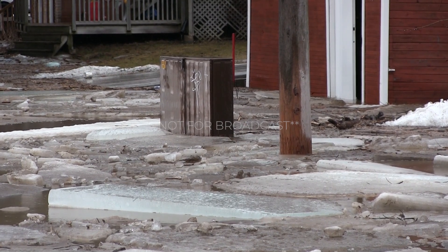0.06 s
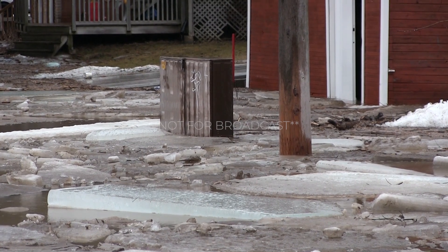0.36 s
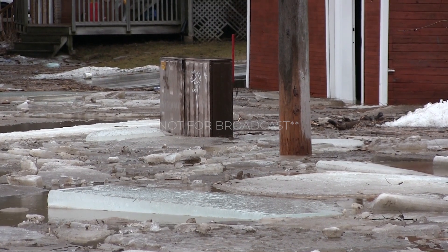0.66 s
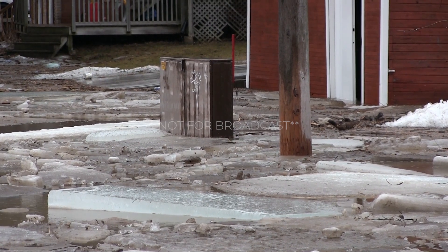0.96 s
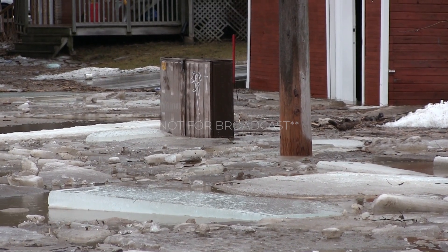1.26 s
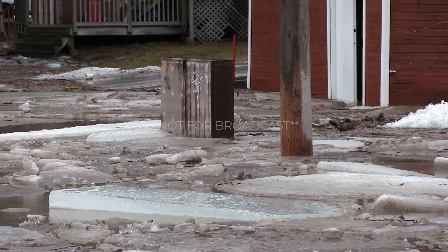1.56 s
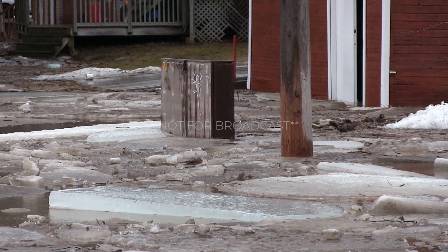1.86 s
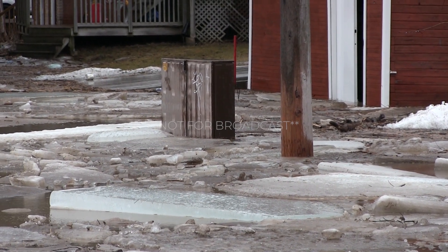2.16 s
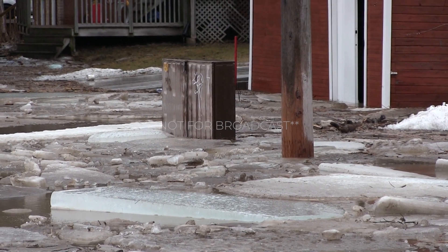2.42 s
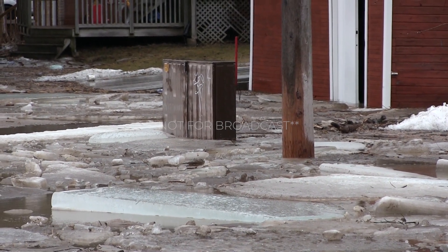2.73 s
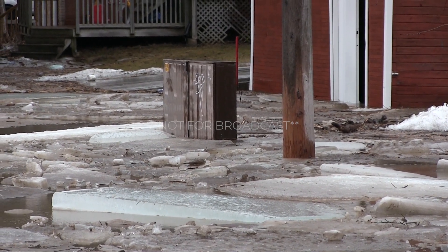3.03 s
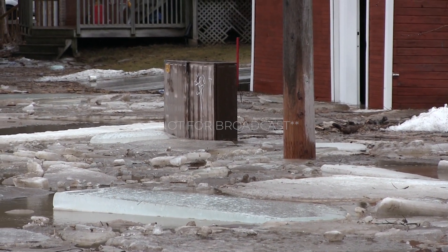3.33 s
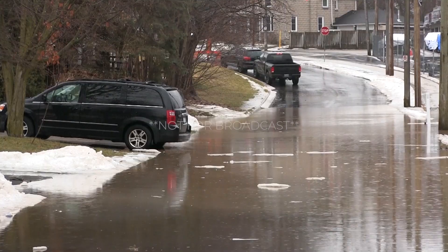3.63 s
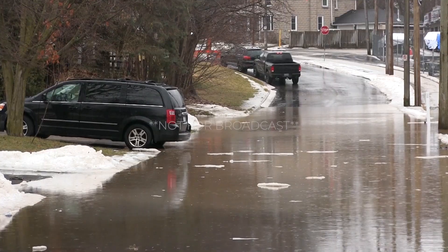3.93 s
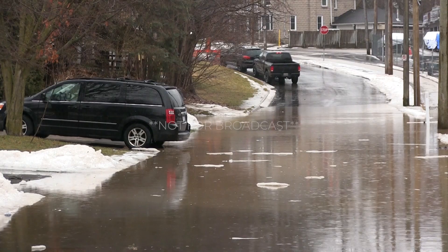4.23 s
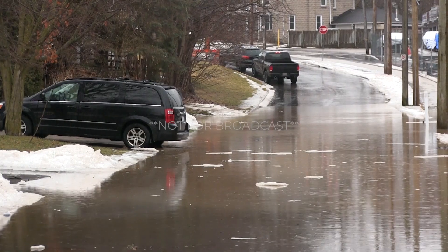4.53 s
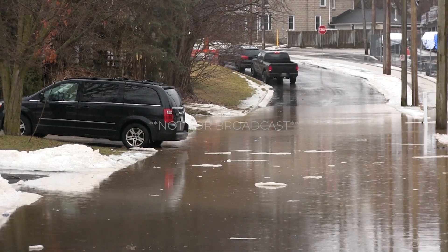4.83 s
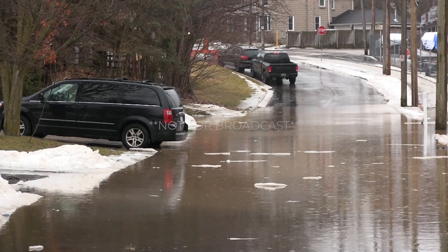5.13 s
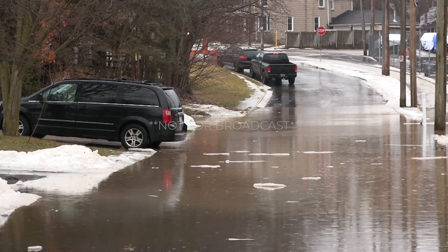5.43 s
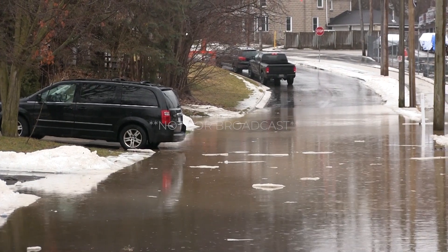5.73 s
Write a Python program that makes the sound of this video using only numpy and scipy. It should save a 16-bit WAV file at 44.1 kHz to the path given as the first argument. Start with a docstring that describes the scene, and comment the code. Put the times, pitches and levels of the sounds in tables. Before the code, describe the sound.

From the start, a flooded river rushes steadily outdoors, with a fine crackle of slush, small gurgles and scattered ticks of ice. At about 1.4 seconds a floe cracks close by, slightly to the left, in one short, sharp snap, and the rush turns a little hollower. From around 1.8 seconds wind buffets the microphone in low, uneven thumps. More ice ticks cluster around 3 seconds.

At 3.3 seconds the sound switches abruptly to a flooded street. The water becomes a quieter, duller, distant wash with light drips, and a deep, steady electrical hum comes in strongly and holds to the end. Gusts swell at about 3.7, 4.4 and 5.1 seconds, and the wind rumble is hardest in the last moments before 6 seconds. The whole sound dips briefly twice, slightly at 4.4 seconds and more deeply at 5.6.

```python
"""A flooded river rushes past with crackling slush and gurgles; floes tick, one cracks close by.
At 3.3 s the scene changes to a quieter flooded street with drips and a deep mains-pitched hum.
Water is churned noise plus tiny ringing pops; the floe snaps into its damped modes.
Wind eddies buffet the two microphone ports, harder as time goes on. The level dips briefly twice."""
import sys
import numpy as np
from scipy import signal
from scipy.fft import rfft, irfft
from scipy.io import wavfile
from scipy.ndimage import uniform_filter1d

SR = 44100
rng = np.random.default_rng(int(sys.argv[2]) if len(sys.argv) > 2 else 0)


def to_wav(sig):
    """Store sig (one row per channel, or 1-D mono) as 16-bit WAV at the path in sys.argv[1].

    Samples outside -1..1 are clipped; the rate is SR.
    """
    pcm = np.clip(np.atleast_2d(sig), -1, 1) * 32767
    pcm = np.round(pcm).astype(np.int16)
    wavfile.write(sys.argv[1], SR, pcm.T)  # frames by channels


N = 254898
TIME_S = np.arange(N) / SR
CHANGE_S = 3.29  # river to street

# river flow: t/s, level/dB
RIVER_LEVEL = [(0, -30.5), (1.33, -31), (1.41, -33), (2.15, -32), (2.45, -33), (3.05, -31.5), (3.29, -33.5)]
# spectra of broad rush, hollow rush, street wash: f/Hz, relative density/dB
BROAD_SPECTRUM = [(30, -15), (100, 3.5), (180, 2), (310, 2.5), (450, 0.5), (650, 2), (950, 2), (1500, -4),
                  (2100, -9.5), (2800, -12.5), (4700, -18), (7800, -30.5), (12000, -31.5), (15800, -36.5)]
HOLLOW_SPECTRUM = [(30, -34), (100, -1.5), (200, 0.5), (420, -0.5), (650, 1), (900, 2), (1500, -6.5),
                   (2100, -10), (2800, -14), (4700, -20), (6400, -25), (7800, -30.5), (12000, -33),
                   (15800, -36.5)]
STREET_SPECTRUM = [(100, -8), (200, -6.5), (400, -9.5), (650, -7), (1000, -8.5), (1400, -11), (2000, -16),
                   (2800, -19), (4200, -24), (5500, -29), (7800, -38.5), (12000, -40.5), (15800, -46)]
# left-right likeness of the water: f/Hz, correlation
RIVER_CORRELATION = [(200, 1), (450, 0.24), (700, 0.54), (2200, .25), (2800, 0.53), (4400, .6),
                     (9000, 0.023)]
STREET_CORRELATION = [(250, 0.076), (600, 0.27), (1200, 0.27), (1900, -0.017), (4000, .56), (5200, 0.37),
                      (7500, -0.082)]
# snaps of the near floe: t/s, level/dB, left-right/dB, tilt/(dB/octave)
FLOE_SNAPS = [(1.3601, -1, 8, 7.5), (1.3626, -32, 1, 5), (1.3646, -7, 2, -5), (1.3667, -33, 4, -3),
              (1.367, -9, 11, -17), (1.3842, -31, 5, 1)]
# modes of the floe: f/Hz, level/dB, t60/s
FLOE_MODES = [(1100, -38, 0.0037), (1690, -12, 0.0068), (2470, -3.5, 0.0065), (3100, 2, 0.0024),
              (4450, -1.5, 0.0085), (5920, 0.5, 0.0041), (6360, -3, .006), (9000, -24, 0.0081)]
# ice ticks, then street drips: t/s, level/dB, f/Hz, grit 0-1, left-right/dB
TICKS_AND_DRIPS = [(.1425, -26.5, 6900, .7, 6), (0.3474, -19, 3020, 0.1, 4), (.387, -29, 11300, .9, 0),
                   (1.317, -22, 4500, 0.7, 6), (1.385, -21, 2400, .6, 4), (1.404, -21, 5770, 0.24, 4),
                   (1.5894, -24, 2400, 0.8, 9), (1.696, -21.5, 1840, 0.46, 9), (1.7362, -27, 8500, 0.95, 7),
                   (1.811, -30, 3760, 1, 8), (2.0403, -28.5, 9500, 1, -7), (2.052, -25, 5800, .8, 6),
                   (2.5153, -30, 4800, 1, 13), (2.544, -25, 10100, 0.35, 11), (2.759, -20, 2400, .4, 5),
                   (2.9626, -26, 4160, 0.9, 7), (2.9998, -25, 3450, .9, 6), (3.0159, -18.5, 3220, .6, 8),
                   (3.0454, -20.5, 5370, 0.55, 9), (3.062, -17, 5850, 0.06, 5),
                   (3.1118, -20, 6400, 0.86, 6), (3.1546, -25, 6500, .3, 0), (3.2633, -24.5, 4100, 0.37, 6),
                   (3.4344, -25, 3830, 0.4, 0), (3.474, -22, 2760, .6, 0), (3.6363, -28, 6500, .5, 0),
                   (4.2014, -26, 5600, .6, 2), (4.409, -20.5, 2400, 0.8, 0), (5.1148, -20, 2000, .8, -2),
                   (5.116, -20, 1130, .6, -3), (5.231, -27, 3800, .4, 0)]
# wind spectra at the ports: f/Hz, relative density/dB
BUFFET_SPECTRUM = [(3, -29), (10, 12), (22, 8), (40, 6), (60, -5), (90, -16.5), (160, -38), (1000, -130)]
FLUTTER_SPECTRUM = [(25, -14), (55, 1.5), (85, -0.5), (130, -7.5), (210, -11), (330, -19.5), (700, -28),
                    (3000, -130)]
# breeze, freshening after a lull: t/s, level/dB
BREEZE_LEVEL = [(0, -31.5), (1.2, -33.5), (1.55, -36.5), (1.87, -20), (3.7, -20.5), (4.65, -23),
                (5.78, -15)]
# gusts: peak t/s, length/s, wash boost/dB, flutter boost/dB
GUST_SWELLS = [(3.384, 0.76, 2.5, 2.5), (3.72, .15, 4.5, 3.5), (4.35, 0.42, 2.5, 7.5), (5.135, 0.5, 1, 5),
               (5.56, 0.17, 0, 1.5)]
# single eddies at the ports: peak t/s, level/dB
EDDY_THUMPS = [(.54, -21), (.84, -24), (.97, -25), (1.16, -27), (1.78, -20.5), (2.06, -14.5), (2.2, -11.5),
               (2.28, -16), (2.51, -19), (2.82, -15.5), (2.92, -13.5), (3.13, -14), (3.29, -12.5),
               (3.72, -12.5), (4.17, -10.5), (4.41, -13), (4.88, -11), (5.631, -7.5)]
# brief level dips: t/s, depth/dB, recovery/s
LEVEL_DIPS = [(4.43, 3.2, .13), (5.642, 12.5, .15)]


def river():
    """Rushing water that turns hollower, with crackling slush, fine ice needles and gurgles."""
    hollow = np.clip((TIME_S - 1.13) / 0.59, 0, 1)
    broad_rush = np.sqrt(1 - hollow) * stereo_noise(BROAD_SPECTRUM, RIVER_CORRELATION)
    hollow_rush = np.sqrt(hollow) * stereo_noise(HOLLOW_SPECTRUM, RIVER_CORRELATION)
    rush = churn(broad_rush + hollow_rush, patchy_db=0.85, flicker_db=0.48)
    slush = pops(per_s=240, low_hz=2200, high_hz=6000, decay_cycles=3.2, spread_db=6, grit=0.56)
    needles = pops(per_s=140, low_hz=5500, high_hz=11000, decay_cycles=1.5, spread_db=4, grit=2)
    gurgle = pops(per_s=200, low_hz=532.6, high_hz=1624, decay_cycles=7.5, spread_db=3.5, grit=0)
    crackle = lowpass(gain(-21) * slush + gain(-35 + 2.7 * hollow) * needles, top_hz=11900)
    water = gain(3) * rush + crackle + gain(-8.5) * gurgle
    fizz_db = (1 - hollow) * 1.74 + hollow * 0.07
    return gain(over_time(RIVER_LEVEL)) * froth(water, fizz_db) * pan(-0.6)


def churn(water, patchy_db, flicker_db):
    """Splashes lift short patches of the spectrum, sometimes all of it."""
    frames = signal.stft(water, nperseg=512, noverlap=384)[2]
    patches = uniform_filter1d(rng.standard_normal(frames.shape[:0:-1]), size=16, axis=0)  # in time
    patches = unit_rms(uniform_filter1d(patches, size=9, axis=1))  # in frequency
    flicker = unit_rms(uniform_filter1d(rng.standard_normal(frames.shape[2]), size=18))
    frames *= gain(patchy_db * patches.T + flicker_db * flicker)
    return signal.istft(frames, nperseg=512, noverlap=384)[1][:, :N]


def froth(water, fizz_db):
    """Froth raises or lowers the water's fizz apart from its body."""
    fizz = signal.sosfiltfilt(signal.butter(2, [1700, 6800], "band", fs=SR, output="sos"), water)
    return water + (gain(fizz_db) - 1) * fizz


def pops(per_s, low_hz, high_hz, decay_cycles, spread_db, grit):
    """Small pops of many pitches and sizes, scattered across the water; rms 1."""
    out, pitches = np.zeros((2, N)), 24
    for hz in np.geomspace(low_hz, high_hz, pitches):
        sizes = gain(spread_db * np.minimum(rng.exponential(1, N), 4))
        onsets = rng.random(N) < per_s / pitches / SR
        train = signal.oaconvolve(sizes * onsets, tick(hz, decay_cycles, grit))[:N]
        place(out, 0, train, pan_db=rng.normal(0, 10))
    return unit_rms(out)


def ice_and_drips():
    """The near floe cracks, small pieces tick, drips fall; walls and water scatter a faint tail."""
    direct = np.zeros((2, N))
    for start_s, level_db, pan_db, tilt_db_per_octave in FLOE_SNAPS:
        place(direct, start_s, gain(level_db) * floe_snap(tilt_db_per_octave), pan_db)
    for start_s, level_db, hz, grit, pan_db in TICKS_AND_DRIPS:
        click = tick(hz, decay_cycles=3.1, grit=grit)
        if start_s > CHANGE_S:  # street drips: farther off, duller
            click = lowpass(click, top_hz=1.1 * hz)
        place(direct, start_s, gain(level_db) * click, pan_db)
    direct = lowpass(direct, top_hz=12000)
    t, t60_s = TIME_S[:SR // 4], 0.13
    tail = rng.standard_normal((2, len(t))) * gain(-60 * t / t60_s)
    tail /= np.linalg.norm(tail[0])
    return direct + gain(-21.5) * signal.fftconvolve(direct, tail, axes=1)[:, :N]


def floe_snap(tilt_db_per_octave):
    """One snap rings the floe's modes; wet ice takes off the top treble."""
    t = TIME_S[:2000]
    ring = sum(gain(db + tilt_db_per_octave * np.log2(hz) - 60 * t / t60_s) * np.sin(2 * np.pi * hz * t)
               for hz, db, t60_s in FLOE_MODES)
    return lowpass(ring / abs(ring).max(), top_hz=10000)


def tick(hz, decay_cycles, grit):
    """A tiny fracture or pop: a short ring and a puff of grit around its pitch."""
    t = TIME_S[:900]
    ring = np.sin(2 * np.pi * hz * t) * np.exp(-t * hz / decay_cycles) * (1 - np.exp(-2 * t * hz))
    band = signal.butter(2, [0.5 * hz, min(2.2 * hz, 14000)], "band", fs=SR)
    puff = signal.lfilter(*band, rng.standard_normal(len(t)) * np.exp(-t / 0.0015))
    return ring + grit * puff / abs(puff).max()


def wind(eddy_s=0.18, buffet_limit=0.84):
    """Eddies push on one port and pull on the other: slow buffets, and flutter that grows with them."""
    eddy_power = sum((gain(db) * swell(peak_s, eddy_s)) ** 2 for peak_s, db in EDDY_THUMPS)
    push = np.sqrt(gain(over_time(BREEZE_LEVEL)) ** 2 + eddy_power)
    _, gust_db = gusts()
    buffets = steady(stereo_noise(BUFFET_SPECTRUM, -0.42), samples=9000) * push * pan(-1.8)
    flutter = steady(stereo_noise(FLUTTER_SPECTRUM, -0.32), samples=6000) * push ** 0.39 * pan(-1.8)
    return buffet_limit * np.tanh(buffets / buffet_limit) + gain(-26 + gust_db) * flutter


def gusts():
    """Gusts swell the street wash and the port flutter; one dB curve for each."""
    return sum(np.outer([wash_db, flutter_db], swell(peak_s, length_s))
               for peak_s, length_s, wash_db, flutter_db in GUST_SWELLS)


def hum(hz=60.7, fundamental_db=-18, octave_db=-43.5, waver_db=1.5, sway_cycles=0.034):
    """A nearly pure drone at mains pitch, wavering slightly in level and phase."""
    drift = [(1, 3), (6, 5), (20, -53), (60, -120)]  # f/Hz, relative density/dB
    phase = 2 * np.pi * (hz * TIME_S + sway_cycles * stereo_noise(drift, 0.23))
    tone = gain(fundamental_db) * np.sin(phase) + gain(octave_db) * np.sin(2 * phase)
    return np.sqrt(2) * tone * gain(waver_db * stereo_noise(drift, 0.5)) * pan(-0.8)


def street():
    """A dull, distant wash of water and wind that swells in gusts, with light dripping."""
    gust_db, _ = gusts()
    wash = churn(stereo_noise(STREET_SPECTRUM, STREET_CORRELATION), patchy_db=1.2, flicker_db=-0.5)
    drips = pops(per_s=85, low_hz=1630, high_hz=4820, decay_cycles=2.7, spread_db=0.5, grit=0.29)
    water = gain([[1.6], [0.5]]) * wash + gain(-13.5) * lowpass(drips, top_hz=9000)
    fizz_db = 1.16 - 0.45 * gust_db  # fizz swells less than the body
    return gain(-37.5 + gust_db) * froth(water, fizz_db)


def stereo_noise(spectrum, correlation):
    """Two partly alike noises of one colour; mid rms 1."""
    hz = np.fft.rfftfreq(N, 1 / SR)
    white = rfft(rng.standard_normal((2, N)))
    alike = np.clip(over_frequency(correlation, hz) if np.ndim(correlation) else correlation, -0.9, 0.95)
    weighted = np.array([white[0] * np.sqrt(1 + alike), white[1] * np.sqrt(1 - alike)])
    mid, side = irfft(weighted * gain(over_frequency(spectrum, hz)), N)
    return np.array([mid + side, mid - side]) / mid.std()


def steady(noise, samples):
    """Evens out slow chance swells."""
    return noise / np.sqrt(uniform_filter1d(noise.mean(0) ** 2, size=samples) + 0.033)


def swell(peak_s, length_s):
    """Smooth rise from 0 to 1 and back."""
    return np.cos(np.pi * np.clip((TIME_S - peak_s) / length_s, -0.5, 0.5)) ** 2


def over_frequency(table, hz):
    table_hz, values = np.transpose(table)
    return np.interp(np.log(hz + 1), np.log(table_hz + 1), values)


def over_time(table):
    return np.interp(TIME_S, *np.transpose(table))


def place(mix, start_s, sound, pan_db):
    part = mix[:, round(start_s * SR):][:, :len(sound)]
    part += pan(pan_db) * sound[:part.shape[1]]


def pan(left_minus_right_db):
    return gain([[left_minus_right_db / 2], [-left_minus_right_db / 2]])


def lowpass(x, top_hz):
    return signal.lfilter(*signal.butter(2, top_hz, fs=SR), x)


def unit_rms(x):
    return x / np.sqrt(np.mean(x ** 2) + 1e-20)


def gain(db):
    return 10 ** (np.asarray(db) / 20)


def scene(crossfade_s=0.021):
    """River with ice, then street with hum and drips; wind over both."""
    in_street = np.clip((TIME_S - CHANGE_S) / crossfade_s + 0.5, 0, 1)
    surroundings = np.sqrt(1 - in_street) * river() + np.sqrt(in_street) * (street() + hum())
    return surroundings + wind() + ice_and_drips()


def record(dry, edge_hz=15850):
    """Two brief level dips, soft clipping of the largest peaks, band limit."""
    dip_db = sum(np.interp(TIME_S - at_s, [-0.025, 0, recovery_s], [0, depth_db, 0])
                 for at_s, depth_db, recovery_s in LEVEL_DIPS)
    dipped = dry * gain(-dip_db) * signal.windows.tukey(N, 0.002)
    clipped = dipped / (1 + dipped ** 6) ** (1 / 6)
    band_limit = signal.firwin(511, edge_hz, window=("kaiser", 9), fs=SR)
    return signal.oaconvolve(clipped, band_limit[None], "same")


dry = scene()
out = record(dry)
to_wav(out)
```